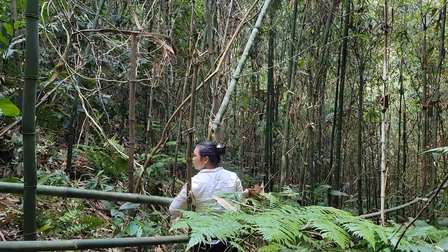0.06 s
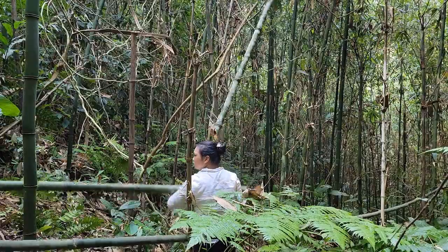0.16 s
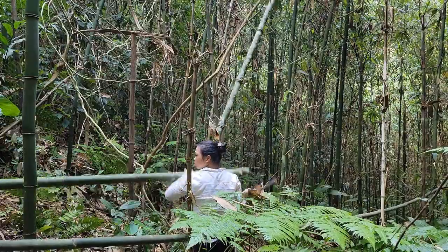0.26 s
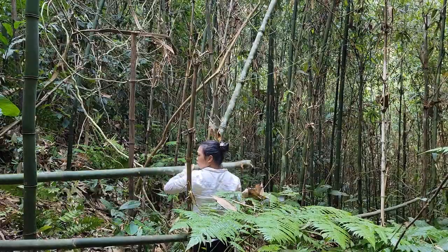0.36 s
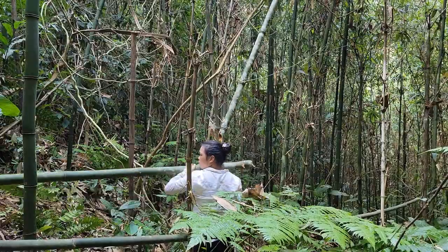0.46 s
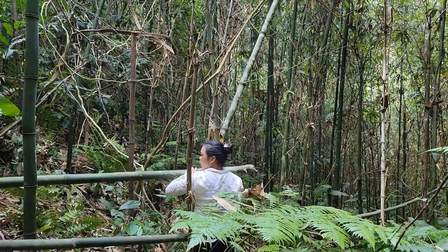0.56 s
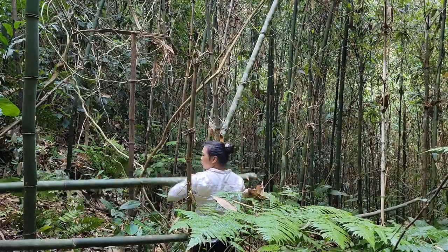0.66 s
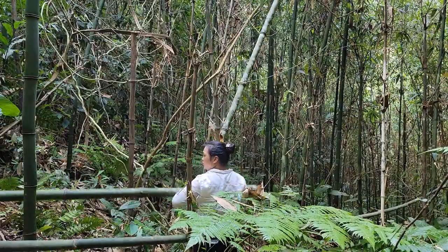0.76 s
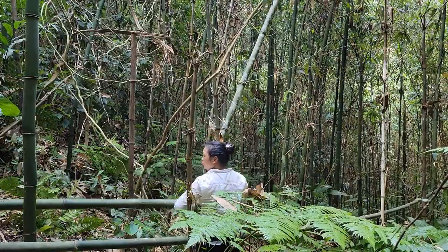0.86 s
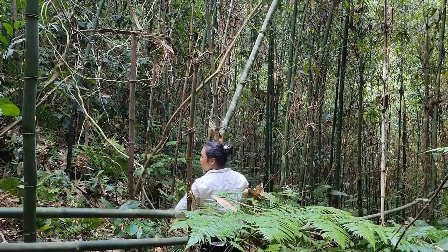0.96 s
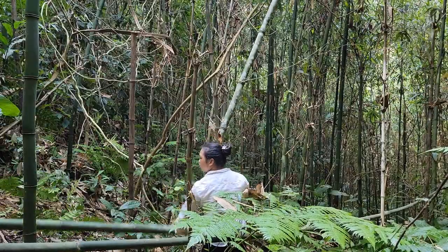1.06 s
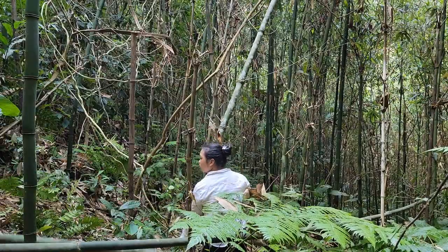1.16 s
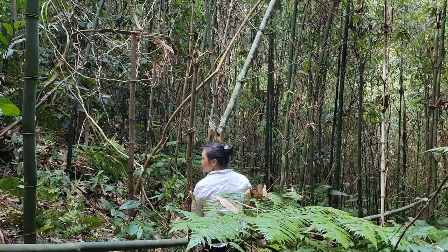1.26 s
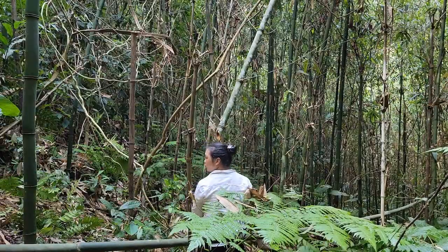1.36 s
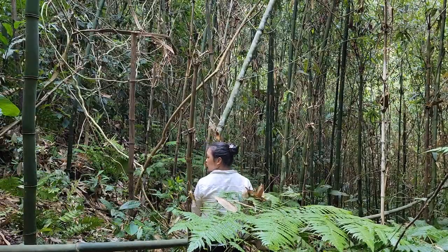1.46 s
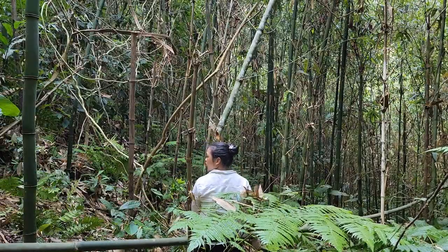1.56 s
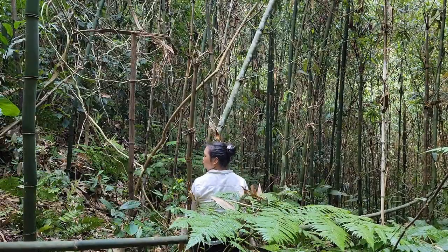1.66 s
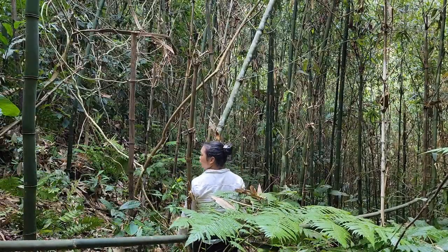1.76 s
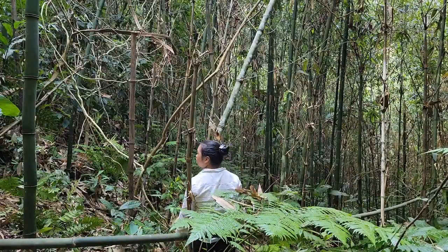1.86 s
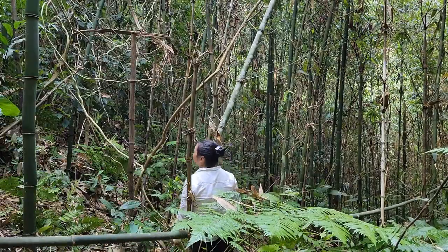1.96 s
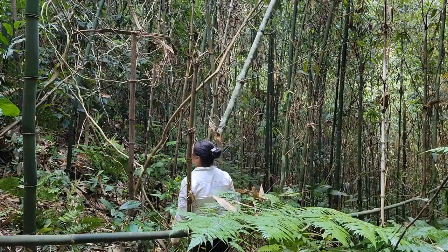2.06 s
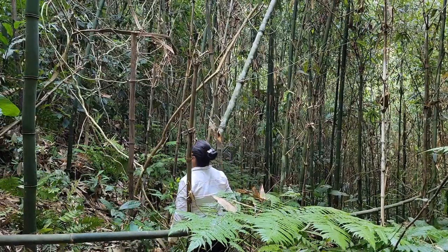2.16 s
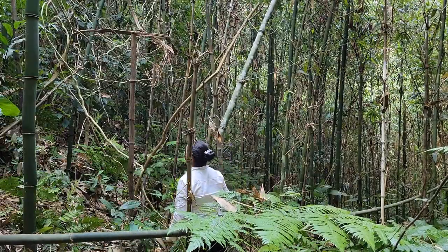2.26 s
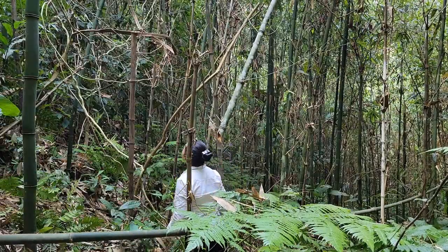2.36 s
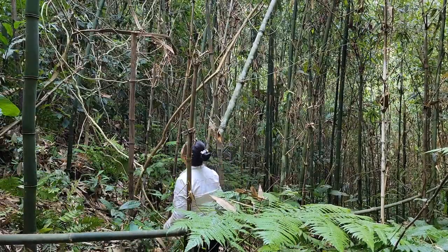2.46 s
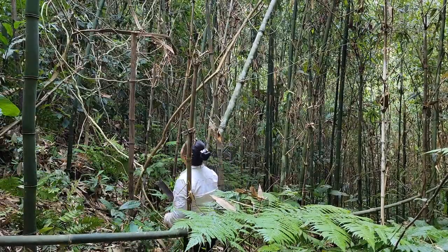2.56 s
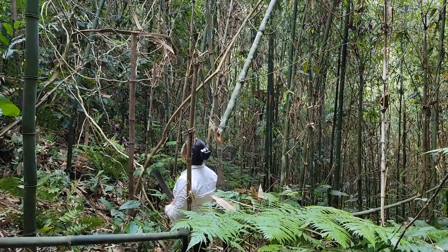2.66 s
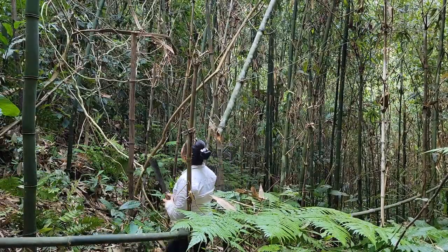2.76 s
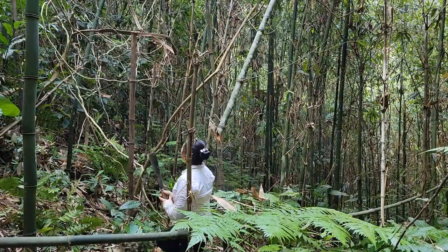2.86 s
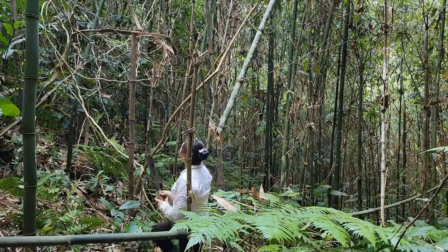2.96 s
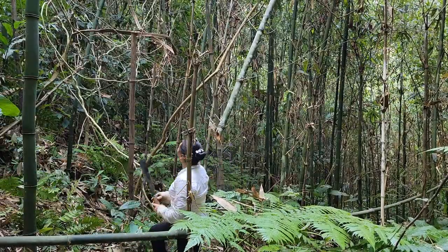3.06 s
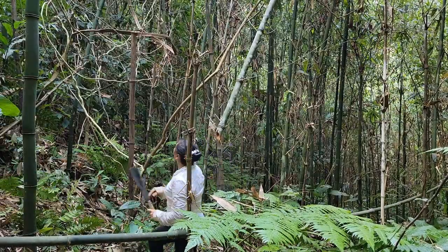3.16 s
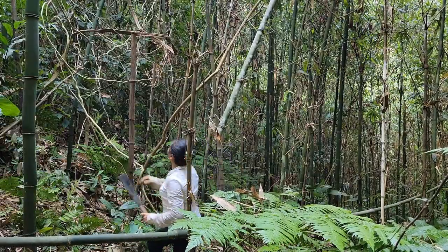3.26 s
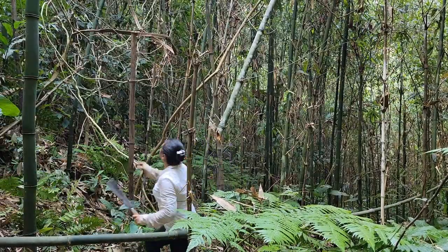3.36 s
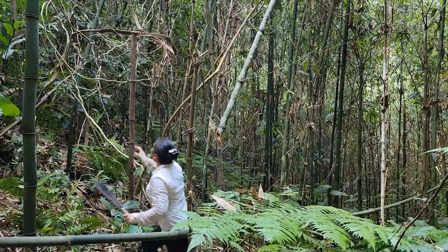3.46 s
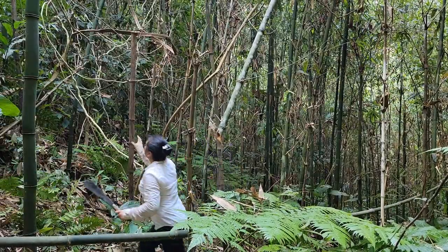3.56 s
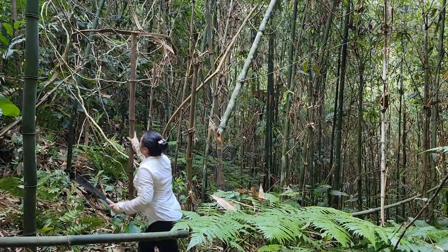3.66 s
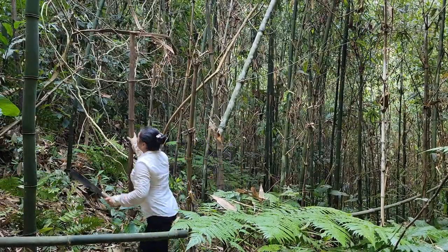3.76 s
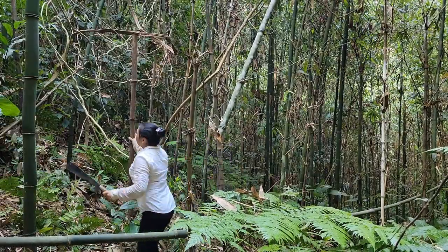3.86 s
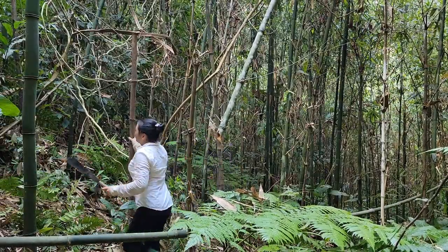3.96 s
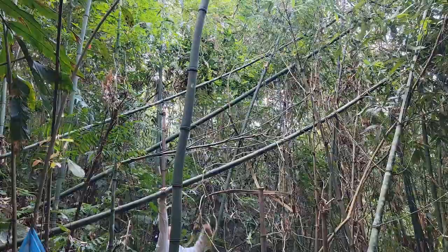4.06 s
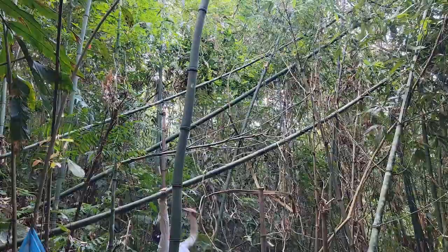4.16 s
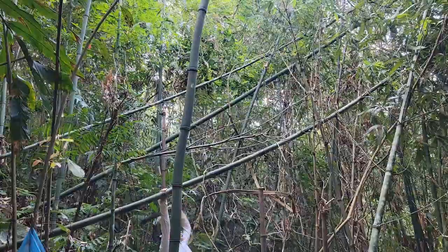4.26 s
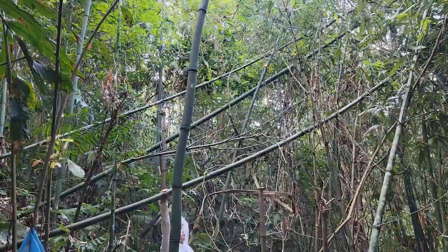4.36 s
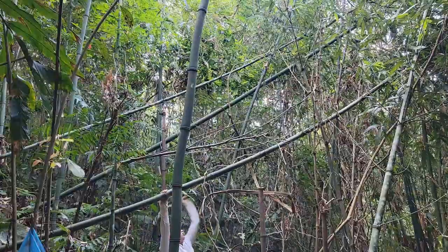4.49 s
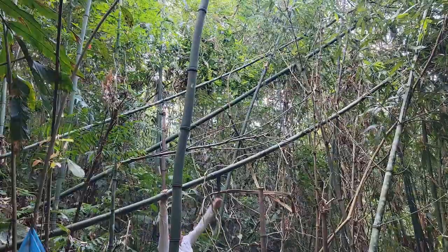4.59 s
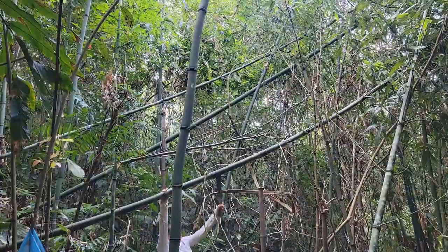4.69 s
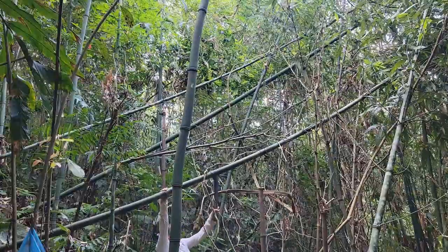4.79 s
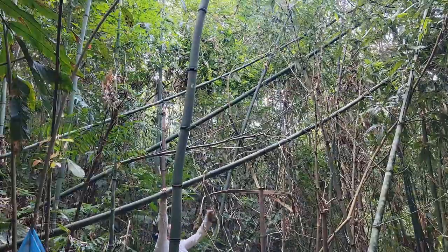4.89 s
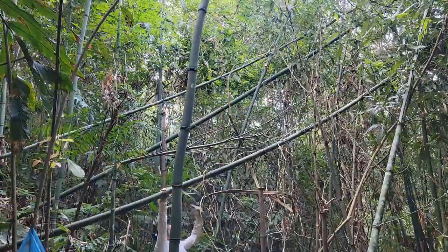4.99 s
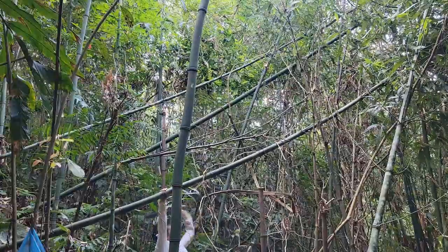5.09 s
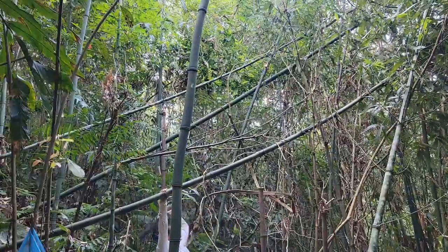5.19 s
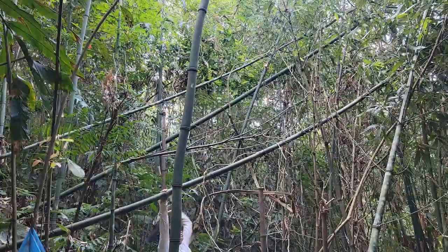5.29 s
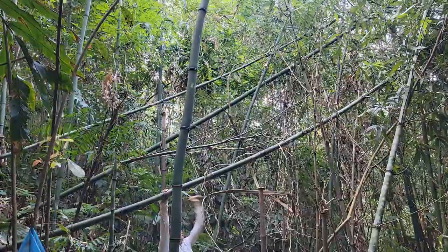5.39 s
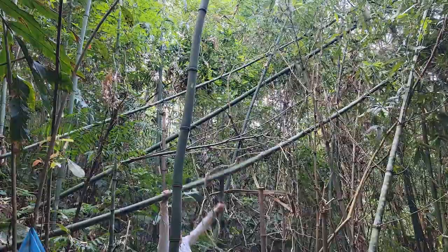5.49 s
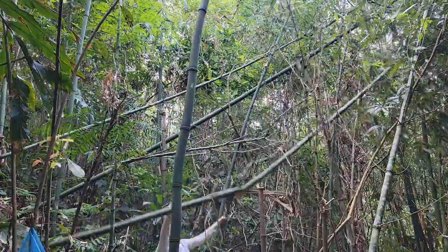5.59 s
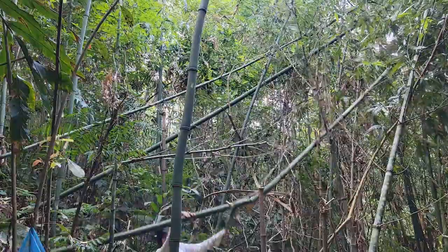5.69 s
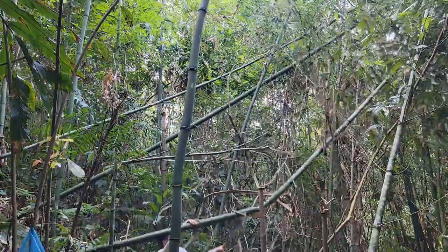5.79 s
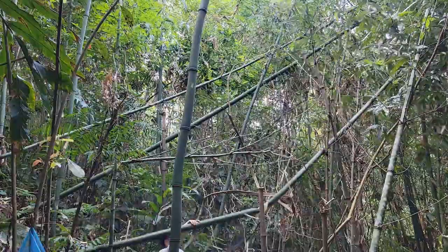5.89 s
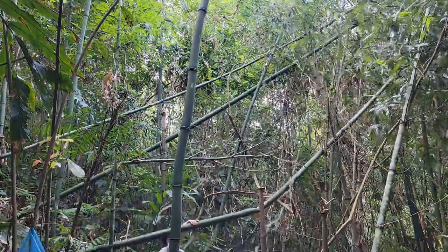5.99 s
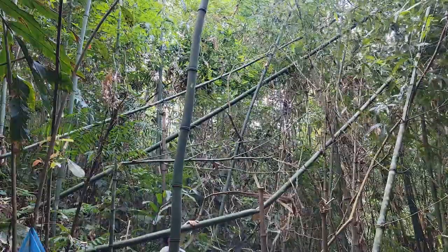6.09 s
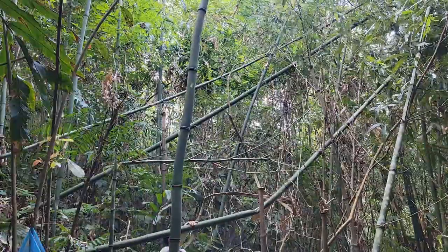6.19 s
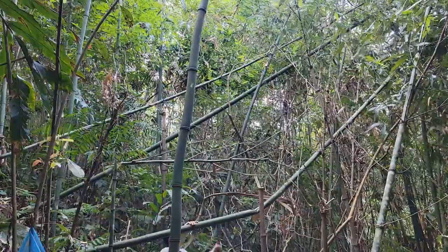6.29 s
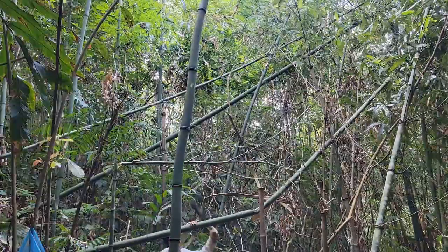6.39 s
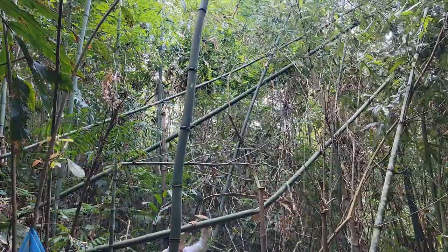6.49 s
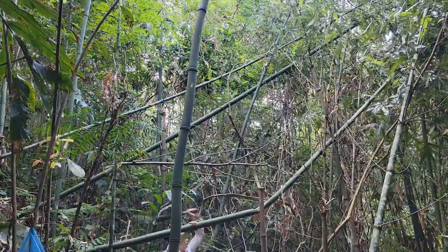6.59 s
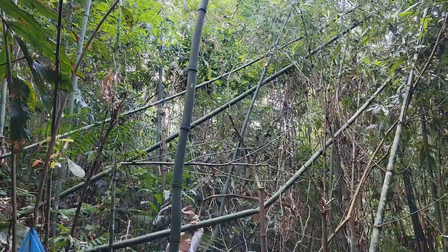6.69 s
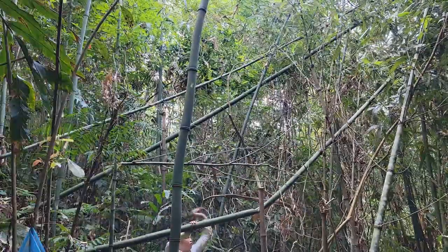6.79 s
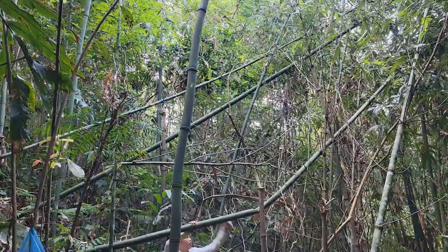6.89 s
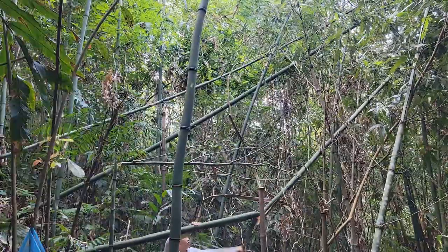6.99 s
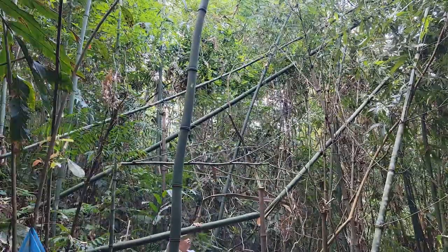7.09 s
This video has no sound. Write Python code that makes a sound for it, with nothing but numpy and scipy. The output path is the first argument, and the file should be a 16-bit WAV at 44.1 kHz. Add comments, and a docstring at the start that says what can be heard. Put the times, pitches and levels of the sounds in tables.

```python
"""Cutting bamboo in a grove

A pole is lowered and thuds onto dry leaves, and steps rustle through the litter. Then a blade bites into
a leaning stem, which cracks, splits and sags, knocking on its neighbours as its leaves drag.
Cracks, knocks and twigs are short bursts through the resonances of a hollow stem; leaves are random grains
and shaped noise. The standing stems scatter the sounds; filtered noise gives still air, a far hum and insects."""
import sys
import numpy as np
from scipy import signal
from scipy.fft import rfft, irfft
from scipy.io import wavfile
from scipy.ndimage import uniform_filter1d

SR = 44100
rng = np.random.default_rng(int(sys.argv[2]) if len(sys.argv) > 2 else 0)


def to_wav(s):
    """Save 16-bit WAV."""
    ch = np.atleast_2d(s).T  # columns
    pcm = np.round(np.clip(ch, -1, 1) * 32767)  # PCM
    wavfile.write(sys.argv[1], SR, pcm.astype(np.int16))


N = 314874  # length of the scene in samples
TAPS = 4096  # length of the stem's response in samples
BINS = np.fft.rfftfreq(TAPS, 1 / SR)  # the frequencies of that response, in Hz
USUAL_CRISP_DB = -6  # crispness of the litter at rest


def amp(db):
    """Turns decibels into gain."""
    return 10 ** (np.asarray(db) / 20)


def unit(x):
    """Scales to an rms of one."""
    return x / np.sqrt(np.mean(x ** 2) + 1e-20)


def read(points, hz):
    """Reads a table between its points, on a log-frequency axis."""
    f, value = np.transpose(points)
    return np.interp(np.log(hz + 1), np.log(f + 1), value)


def add(mix, s, sound):
    """Mixes a sound in at time s, in seconds."""
    part = mix[..., round(s * SR):][..., :sound.shape[-1]]
    part += sound[..., :part.shape[-1]]


def peak(f, hz, width):
    """Power response of one resonance."""
    return 1 / (1 + (2 * (f - hz) / width) ** 2)


def causal(gain):
    """The impulse response of unit energy that has these relative gains and starts at once."""
    log_gain = np.log(np.r_[gain, gain[-2:0:-1]] + 1e-6)
    # the Hilbert transform of the log gain gives the phase that puts the energy first
    spectrum = np.exp(np.conj(signal.hilbert(log_gain)))
    response = irfft(spectrum[:len(gain)])
    return response / np.linalg.norm(response)


def even(x, smooth_hz=70):
    """Evens out the broad colour of a train of clicks and gives it unit energy; its fine detail stays."""
    size = 16 * TAPS
    power = abs(rfft(x, size)) ** 2
    smooth = uniform_filter1d(power, int(smooth_hz * size / SR) + 1)[::16]
    inverse = causal((abs(smooth) + 1e-12) ** -.5)
    flat = signal.fftconvolve(x, inverse)[:len(x)]
    return flat / np.linalg.norm(flat)


def diffuse(pair, field, size=512, apart_hz=650):
    """Colours two unrelated signals by field(hz, s) in dB; the bass reaches both ears alike."""
    overlap = size * 3 // 4
    hz, t, z = signal.stft(pair, SR, nperseg=size, noverlap=overlap)
    mid, side = z * amp(field(hz[:, None], t))
    spread = (hz / np.hypot(hz, apart_hz))[:, None]
    ears = np.array([mid + spread * side, mid - spread * side]) / np.sqrt(1 + spread ** 2)
    return signal.istft(ears, SR, nperseg=size, noverlap=overlap)[1][:, :pair.shape[1]]


def grove(direct_db, near_db, near_t60, far_db, far_rise=0.0057, smear=.0008, echoes_per_s=8000,
          side_db=0.0, apart_hz=850):
    """Two-ear response: direct sound, scatter off the nearest stems, and the whole grove's tail (times in s)."""
    # time the tail takes to die away by 60 dB: pitch_hz, t60_s
    tail_t60 = [(100, 0.74), (300, 0.16), (700, 0.31), (1500, 0.27), (4000, 0.44), (8000, 0.38),
                (15000, 0.31)]
    t = np.arange(SR // 2) / SR
    present = rng.random((2, 2, len(t))) < echoes_per_s / SR
    echoes = rng.standard_normal((2, 2, len(t))) * present
    near = echoes[0] * amp(-60 * t / near_t60)
    far = diffuse(echoes[1], lambda f, s: -60 * s / read(tail_t60, f), size=256, apart_hz=1)
    far = far * (1 - np.exp(-t / far_rise))
    mid, side = (amp(near_db) * unit(near) + amp(far_db) * unit(far)) / np.sqrt(len(t))
    # a rough contact spreads the first arrival over about a millisecond
    first = rng.standard_normal(len(t)) * np.exp(-t / smear)
    mid += amp(direct_db) * first / np.linalg.norm(first)
    # long waves reach both ears alike
    side = amp(side_db) * signal.lfilter(*signal.butter(1, apart_hz, "high", fs=SR), even(side))
    mid = even(mid)
    return np.array([mid + side, mid - side]) / np.sqrt(2)


def stem(hollow_db, local_hz, local_db, treble_db, bass_db, sharpness, bright_hz=3500, deep_hz=400):
    """The stem's response: a snap, the hollow modes, and the ring of the place that is hit."""
    # modes of the hollow stem, before hollow_db: pitch_hz, width_hz, level_db
    hollow_modes = [(223.5, 25, 1.5), (280, 41, 12.5), (384, 23, 11), (549, 38, 13), (560, 41, 15),
                    (807, 50, 13.5), (938, 56, 13), (1260, 73, 14.5), (1410, 87, 11), (1800, 78, 6.5),
                    (2150, 57, -11), (2760, 44, -3), (3530, 360, -7.5)]
    # colour of snapping fibres, before treble and bass: pitch_hz, level_db
    snap_colour = [(20, -64.5), (45, -24.5), (90, -7), (150, -15), (215, -10), (600, -0.5), (1200, -2),
                   (2500, 2.5), (4500, -1), (7500, -5.5), (10500, -13), (15500, -10.5)]
    modes = sum(amp(db + hollow_db) ** 2 * peak(BINS, hz, width) for hz, width, db in hollow_modes)
    local = amp(local_db) ** 2 * peak(BINS, local_hz, 2 * local_hz / sharpness) ** 2
    treble = treble_db * BINS ** 2 / (BINS ** 2 + bright_hz ** 2)
    bass = bass_db / (1 + (BINS / deep_hz) ** 6)
    snap = amp(read(snap_colour, BINS) + treble + bass)
    return causal(snap * np.sqrt(1 + modes + local))


def background(air_db=-73):
    """Still air, a faint wavering hum and insect hiss: noise shaped into one broad colour and a few bands."""
    # colour of the still air, before air_db: pitch_hz, level_db
    air_colour = [(20, -7), (50, 10), (130, -4.5), (220, 0.5), (400, 0), (900, 3.5), (1700, -1),
                  (3000, -1.5), (6000, -4), (8500, -17.5), (11000, -12), (16000, -35.5)]
    # a far hum and the insects: pitch_hz, width_hz, level_db
    drones = [(290, 49, -81.5), (577, 71, -76), (7100, 1000, -72.5)]
    air = diffuse(rng.standard_normal((2, N)), lambda f, t: read(air_colour, f), size=2048)
    out = amp(air_db) * unit(air)
    for hz, width, db in drones:
        def band(f, t):
            return -10 * np.log10(1 + (2 * (f - hz) / width) ** 4)
        out += amp(db) * unit(diffuse(rng.standard_normal((2, N)), band, size=2048))
    return out


def litter(t):
    """Level and crispness of the leaves in dB at times t: the powers of long drags and brief stirs add up."""
    # Leaves dragged along; levels before drag_db: start_s, level_db, crispness_db
    # as the pole slides down
    slide = [(0.9, -66, -13.5), (1.028, -67, 4.5), (1.26, -55, -4), (1.576, -57.5, 9), (1.966, -59, 6),
             (2.146, -65, -1), (2.22, -76.5, -12)]
    # as the leaning stem is gripped
    gripping = [(4.08, -73, -4), (4.728, -57, -10.5), (5.45, -66, -12)]
    # as its crown sags
    sag = [(5.85, -47.5, -2), (6.468, -53.5, -9.5), (6.734, -59, -6.5), (6.95, -56, -11.5)]
    # brief stirs, from steps and swaying branches: peak_s, level_db, swelling_s, settling_s, crispness_db
    stirs = [(.05, -69, 0.17, 0.31, 2.5), (.29, -59, 0.07, 0.1, -5), (.55, -65, 0.11, 0.64, -13.5),
             (0.984, -61.5, .008, .025, 7), (1.111, -54, 0.042, 0.13, 1.5), (1.208, -50, 0.0026, .04, 1.5),
             (1.35, -45.5, 0.034, 0.056, -2.5), (1.73, -51, 0.047, .04, 3.5), (2.52, -65, 0.096, 0.18, -5),
             (3.152, -51.5, 0.037, 0.11, -12), (3.45, -68, 0.064, 0.96, -6),
             (4.07, -60.5, 0.014, 0.24, -0.5), (4.96, -66, 0.032, 0.13, 0), (5.76, -46.5, 0.038, .11, 2),
             (6.78, -49.5, 0.018, 0.028, -16)]
    drag_db, drag_rise_s, drag_fade_s = -1, 0.03, .12
    rest_db = -80  # the litter is never quite still

    def swell(start, end, rise_s, fade_s):
        early, late = np.maximum(start - t, 0), np.maximum(t - end, 0)
        return np.exp(-early / rise_s - late / fade_s)

    parts = [(amp(rest_db) * np.ones(len(t)), USUAL_CRISP_DB)]
    for drag in (slide, gripping, sag):
        s, db, crisp = np.transpose(drag)
        gain = amp(drag_db + np.interp(t, s, db)) * swell(s[0], s[-1], drag_rise_s, drag_fade_s)
        parts.append((gain, np.interp(t, s, crisp)))
    for s, db, swelling, settling, crisp in stirs:
        parts.append((amp(db) * swell(s, s, swelling, settling), crisp))
    power = sum(gain ** 2 for gain, _ in parts)
    crispness = sum(gain ** 2 * crisp for gain, crisp in parts) / power  # the louder part counts more
    return 10 * np.log10(power), crispness


def leaves(level_db=3, grains_per_s=1200, size_db=5.0, wash=1.0, patchy_db=1.5,
           scrape_hz=2900, scrape_width=800, catch_db=0.57, catch_hz=25):
    """Countless small crackles, scattered by the stems, over the soft wash of leaf sliding on leaf."""
    # colour of rustling dry leaves: pitch_hz, level_db
    leaf_colour = [(20, -38.5), (90, -9.5), (160, -7), (350, -2), (700, -0.5), (1400, -3.5), (2100, -2),
                   (2900, 0), (4500, 0), (7500, 0), (10500, -7.5), (15500, -3.5)]
    # the pole's skin scraping over the litter lifts one resonance: time_s, lift_db
    scrape_lift = [(.9, 3.5), (1.05, 6.5), (1.7, 5), (1.95, 0.5), (2.45, 3), (2.55, 3.5), (2.8, 1)]
    sizes = amp(size_db * np.minimum(rng.exponential(1, N), 5))
    clicks = sizes * rng.choice([-1, 1], N) * (rng.random(N) < grains_per_s / SR)
    place = grove(direct_db=-1, near_db=-12.5, near_t60=0.029, far_db=-5.5)
    grains = unit(signal.fftconvolve(clicks[None], place, axes=1)[:, :N])

    def field(hz, t):
        clumps = rng.standard_normal((len(hz), len(t)))
        clumps = uniform_filter1d(clumps, size=14, axis=0)
        clumps = unit(uniform_filter1d(clumps, size=6, axis=1))
        crispness = np.clip(litter(t)[1] - USUAL_CRISP_DB, -10, 8)
        # crisp leaves gain much treble and little body; dull leaves lose mostly treble
        tilt = crispness * read([(1000, 0.072), (4500, 0.3), (11000, 0.75)], hz)
        scrape = np.interp(t, *np.transpose(scrape_lift)) * peak(hz, scrape_hz, scrape_width)
        return read(leaf_colour, hz) + patchy_db * clumps + tilt + scrape

    rustle = unit(diffuse(grains + wash * rng.standard_normal((2, N)), field))
    # leaves catch and slip
    catching = unit(signal.lfilter(*signal.butter(2, catch_hz, fs=SR), rng.standard_normal(N)))
    return rustle * amp(level_db + catch_db * catching + litter(np.arange(N) / SR)[0])


def ticks(level_db=-40, ticks_per_s=.9, size_db=3.0):
    """Now and then a dry stalk, of one of five pitches, gives a faint ringing tick of its own."""
    out = np.zeros((2, N))
    for hz in np.geomspace(1100, 8000, num=5):
        sizes = amp(size_db * np.minimum(rng.exponential(1, N), 2))
        clicks = sizes * (rng.random(N) < ticks_per_s / SR)  # this rate holds for each pitch
        tick = stem(hollow_db=-8.5, local_hz=hz, local_db=16.5, treble_db=-4, bass_db=-6.5, sharpness=9)
        place = grove(direct_db=-2, near_db=4.5, near_t60=0.038, far_db=-12.5)
        ringing = signal.oaconvolve(clicks, tick)[None, :N]
        out += signal.fftconvolve(ringing, place, axes=1)[:, :N]
    return amp(level_db) * out


def twigs(level_db=-6, twigs_per_s=16, size_db=2.0, ring_db=13):
    """Thin twigs of five pitches tick at random, louder wherever the litter is stirred."""
    out = np.zeros((2, N))
    for hz in np.geomspace(900, 3400, num=5):
        sizes = amp(size_db * np.minimum(rng.exponential(1, N), 3))
        clicks = sizes * (rng.random(N) < twigs_per_s / SR)  # this rate holds for each pitch
        tick = stem(hollow_db=-4.0, local_hz=hz, local_db=ring_db, treble_db=5.5, bass_db=-3.0, sharpness=1.6)
        place = grove(direct_db=-7.0, near_db=-2.0, near_t60=0.18, far_db=-14.0)
        ringing = signal.oaconvolve(clicks, tick)[None, :N]
        out += signal.fftconvolve(ringing, place, axes=1)[:, :N]
    return unit(out) * amp(level_db + litter(np.arange(N) / SR)[0])


def thuds(rough=0.41, rough_hz=45):
    """Poles on the ground, and the body of the cracking stem, give a few low cycles that swell and die."""
    # low thumps of poles on the ground and of the cracking stem's body:
    # start_s, level_db, pitch_hz, swelling_s
    low_thumps = [(1.069, -58, 68.6, .04), (1.202, -47, 74, 0.042), (1.345, -37, 81.4, 0.032),
                  (1.345, -43.5, 219, 0.0061), (1.347, -45, 348, 0.0075), (1.366, -52.5, 114.3, 0.056),
                  (1.499, -54.5, 107.6, 0.051), (1.726, -46, 79, .029), (4.661, -56.5, 96, 0.017),
                  (5.54, -29, 216.5, 0.01), (6.05, -54, 90, .04), (6.331, -65, 73, 0.033),
                  (7.003, -44, 82.2, 0.018)]
    out, t = np.zeros(N), np.arange(SR // 2) / SR
    for s, db, hz, swelling in low_thumps:
        swell = (t / swelling * np.exp(1 - t / swelling)) ** 2
        add(out, s, amp(db) * swell * np.sin(2 * np.pi * hz * t))
    # slow noise makes the level uneven
    unevenness = unit(signal.lfilter(*signal.butter(2, rough_hz, fs=SR), rng.standard_normal(N)))
    return out * (1 + rough * unevenness)


def knocks(level_db=16):
    """Single contacts ring the stem; those deeper in the grove arrive more scattered."""
    # poles and twigs knocking together; levels before level_db, scatter by the trunks in between:
    # start_s, level_db, pitch_hz, ring_db, treble_db, scatter_db
    contacts = [(.111, -37, 7600, 8.5, 12, -2), (.602, -35, 1310, 23.5, -12, -20),
                (1.207, -40, 2880, -8, -1, 7), (1.3457, -16, 635, 15, -3, 8), (1.361, -26.5, 620, 24, 1, 3),
                (1.394, -35.5, 700, -6, 4, -9), (1.676, -41.5, 2050, 12, -27, -2),
                (1.733, -35.5, 1140, 7, -25, -3), (1.785, -38.5, 670, 26, -4, 10),
                (1.9332, -27, 1264, 18, -4, -14.5), (1.935, -31, 1930, 7, -4, -6),
                (2.137, -43.5, 1720, 12, -1, 12), (3.556, -51.5, 3080, 24, 0, 0),
                (4.069, -43, 3130, 6, 2, -7), (4.13, -48, 1350, 16, -14, 15), (4.261, -43, 3620, 2, 0, -3),
                (4.355, -49, 1300, 13.5, -9.5, 3), (4.492, -49.5, 1110, 31, -3, -2),
                (4.605, -29, 3800, 6.5, 0, 20), (5.067, -44, 2050, 5, -11, -3),
                (5.478, -24, 1320, 13, 1.5, 20.5), (5.689, -18, 806, 12, -8.5, -16),
                (5.732, -25.5, 1400, -2, -18, 6), (5.761, -23.5, 825, 9, -6, -5),
                (5.8045, -13, 1720, 14, -12, -11), (5.807, -16, 780, 6, -17, 5.5),
                (5.963, -33, 1360, 20, -38, -5), (5.965, -29.5, 563, 11, -38, 2),
                (5.995, -33, 634, 13, -6, 16), (6.046, -27, 1350, 20, 8, 4), (6.137, -29, 1810, 14, 1, -6),
                (6.138, -37.5, 1300, 26, -8, 3), (6.233, -27, 1336, 22, -11, 10),
                (6.337, -38.5, 960, 14, -16, 1), (6.370, -39.5, 1240, 10.5, -16, -10),
                (6.926, -35.5, 1480, 15, -12, 5)]
    out = np.zeros((2, N))
    for s, db, hz, ring_db, treble_db, scatter_db in contacts:
        sound = stem(hollow_db=-9.0, local_hz=hz, local_db=ring_db, treble_db=treble_db,
                     bass_db=-6.5, sharpness=9.8)
        place = grove(direct_db=-11.5, near_db=scatter_db, near_t60=0.068, far_db=scatter_db - 10,
                      side_db=1.5)
        add(out, s, amp(level_db + db) * signal.fftconvolve(sound[None], place, axes=1))
    return out


def tear(tearing, body, fibres_per_s=2600, spread_db=-11):
    """A snap, then a dying run of fibres; the torn place sounds close by, the whole stem into the grove."""
    even_tearing_s = 0.0055  # a tear of this length is as strong as the snap that starts it
    t = np.arange(TAPS) / SR
    breaks = rng.random(TAPS) < fibres_per_s / SR
    fibres = rng.standard_normal(TAPS) * breaks * np.exp(-t / tearing)
    drive = tearing / even_tearing_s * fibres / (np.linalg.norm(fibres) + 1e-9)
    drive[0] += 1  # the snap
    whole = stem(hollow_db=-2.5, local_hz=2200, local_db=2, treble_db=12, bass_db=1, sharpness=5.3)
    close_place = grove(direct_db=-5, near_db=-1, near_t60=0.062, far_db=-17.5)
    wide_place = grove(direct_db=-39, near_db=-24, near_t60=0.084, far_db=-4.5, far_rise=0.013)
    close = signal.fftconvolve(body[None], close_place, axes=1)
    wide = signal.fftconvolve(whole[None], wide_place, axes=1)
    return signal.fftconvolve(even(drive)[None], close + amp(spread_db) * wide, axes=1)


def cracks(level_db=16):
    """The skin snaps brightly, the wall splits with a woody clack, and the opened tube booms."""
    # the stem cracks; levels before level_db, strip = the torn strip, lags counted from the snap:
    # start_s, snap_db, tearing_s, strip_hz, strip_ring_db, treble_db, bass_db,
    # split_lag_s, split_db, boom_lag_s, boom_db, boom_hz
    breaks = [(4.6596, -4.5, 0.0047, 2330, 16, 12, 2, 0.0017, -6.5, 0.0041, -16, 308),
              (5.529, 2, 0.019, 2793, 5, 11, 3.5, 0.0064, -5, 0.02, -2, 540),
              (5.637, 0, 0.0023, 1497, 22, 14.5, -4, 0.00091, -5, .002, -8, 713),
              (6.998, 0.5, 0.024, 1950, 9, 5, -0.5, .026, -10, 0.045, -10, 564)]
    split_tearing_lags = 0.39  # the split tears for this share of its lag
    boom_tearing_s = .006
    out = np.zeros((2, N))
    for (s, snap_db, tearing, strip_hz, strip_db, treble_db, bass_db,
         split_lag, split_db, boom_lag, boom_db, boom_hz) in breaks:
        skin = stem(hollow_db=4, local_hz=strip_hz, local_db=strip_db, treble_db=treble_db,
                    bass_db=bass_db, sharpness=9.9)
        wall = stem(hollow_db=-6, local_hz=1240, local_db=10, treble_db=2.5,
                    bass_db=bass_db + 5, sharpness=5.5)
        tube = stem(hollow_db=-3, local_hz=boom_hz, local_db=16, treble_db=-2.5,
                    bass_db=bass_db - 1, sharpness=6.6)
        add(out, s, amp(snap_db) * tear(tearing, skin))
        add(out, s + split_lag, amp(split_db) * tear(split_tearing_lags * split_lag, wall))
        add(out, s + boom_lag, amp(boom_db) * tear(boom_tearing_s, tube))
    return amp(level_db) * out


def scene(right_db=0.5):
    """Cracks and knocks come from a little to the right; leaves and air are all around."""
    blows = (cracks() + knocks()) * amp([[-right_db], [right_db]])
    return blows + thuds() + leaves() + twigs() + ticks() + background()


def record(dry, edge_hz=15980):
    """The loudest peaks overload softly; then a filter takes away all above the band edge."""
    held = dry / (1 + dry ** 6) ** (1 / 6)
    low_pass = signal.firwin(511, edge_hz, window=("kaiser", 9), fs=SR)
    return signal.oaconvolve(held, low_pass[None], "same")


dry = scene()
out = record(dry)
to_wav(out)
```